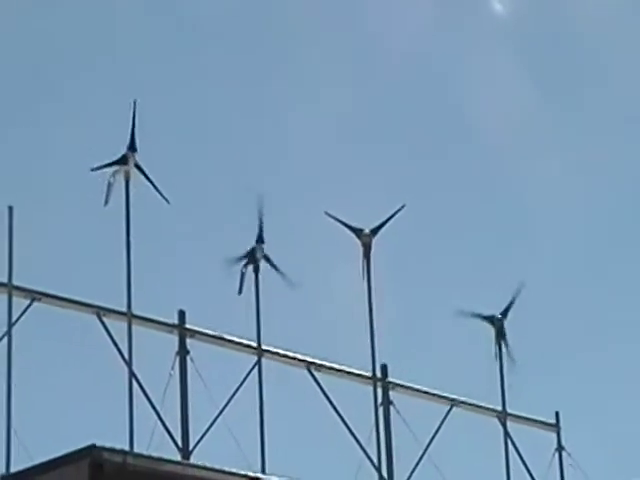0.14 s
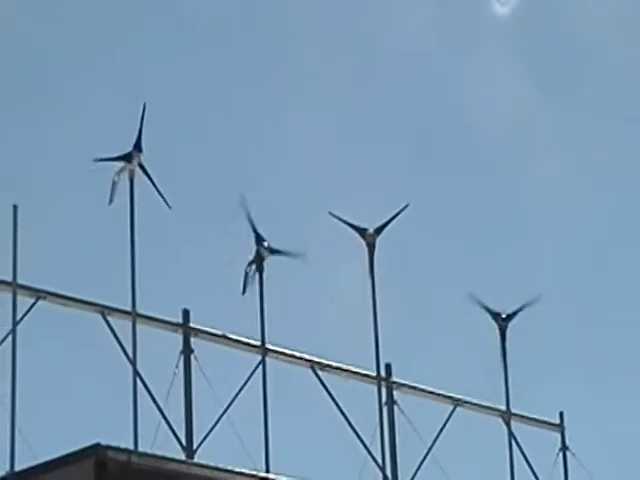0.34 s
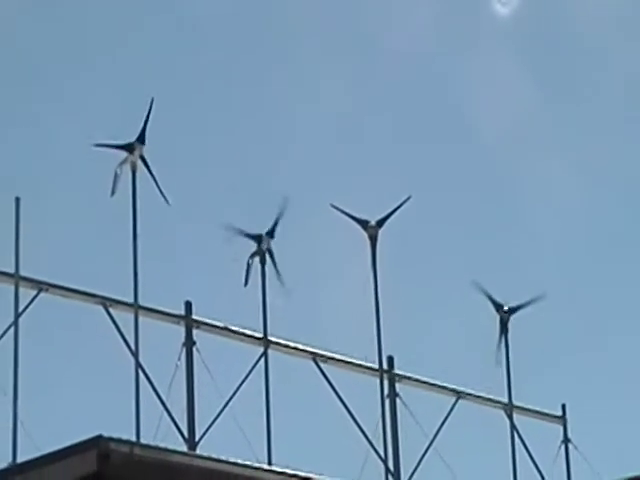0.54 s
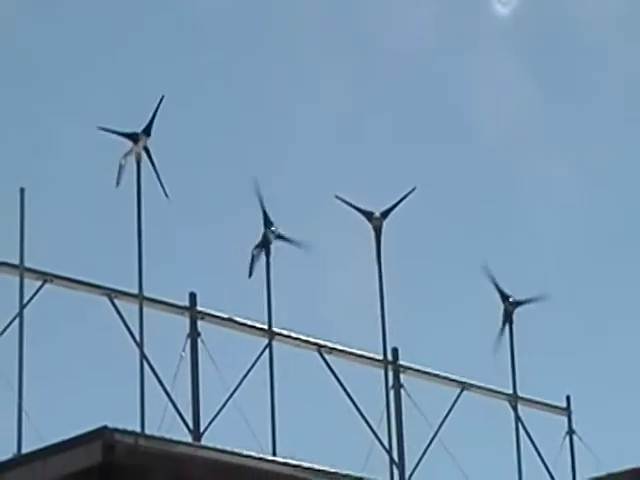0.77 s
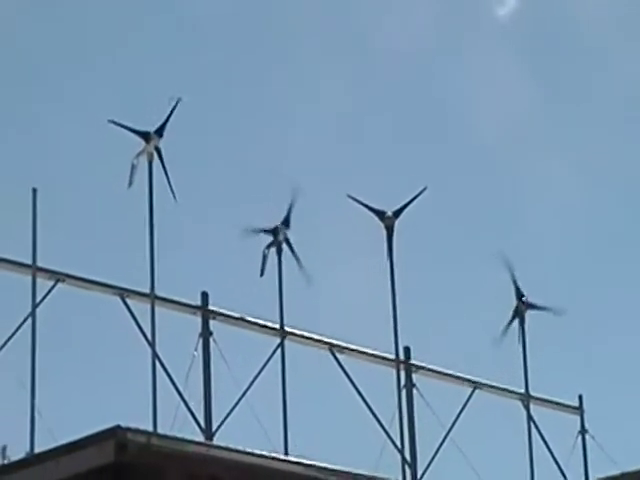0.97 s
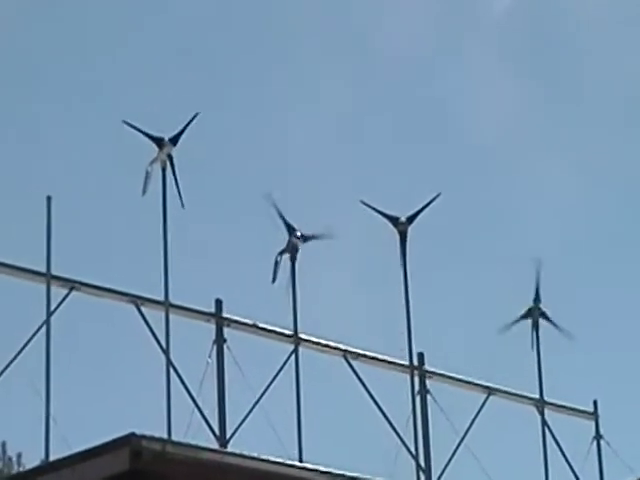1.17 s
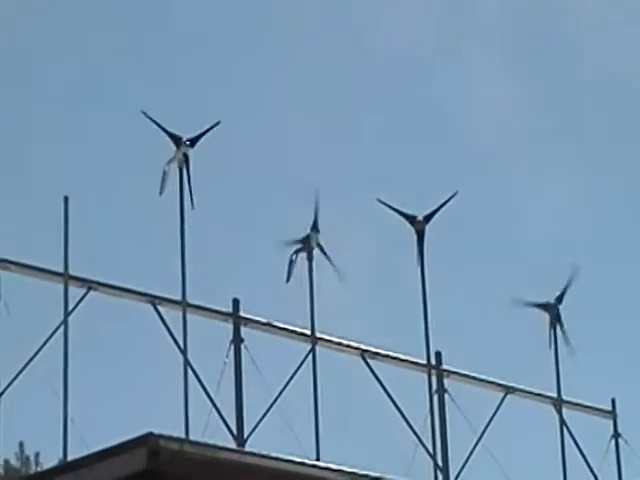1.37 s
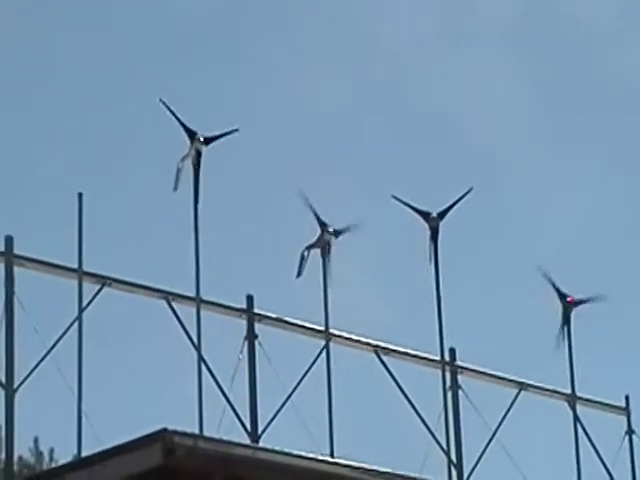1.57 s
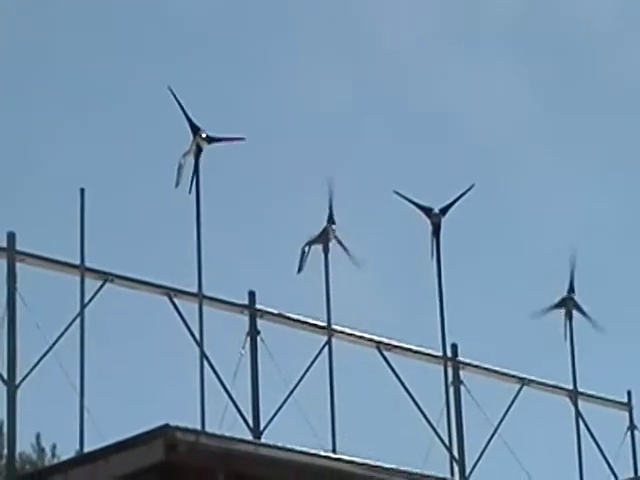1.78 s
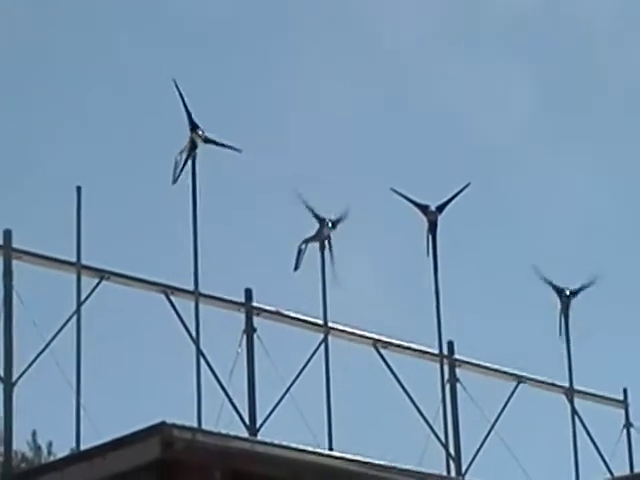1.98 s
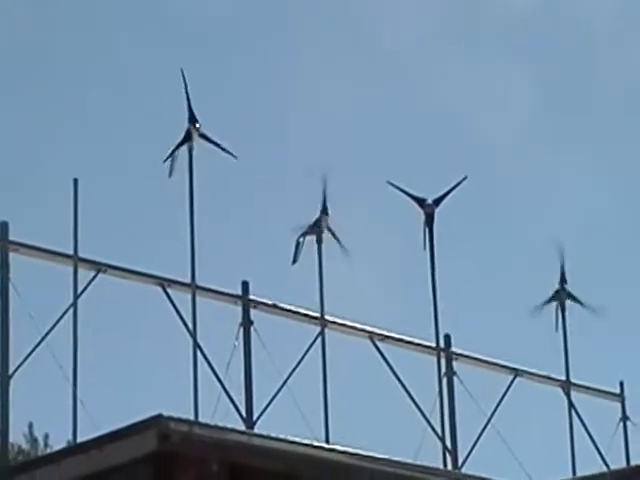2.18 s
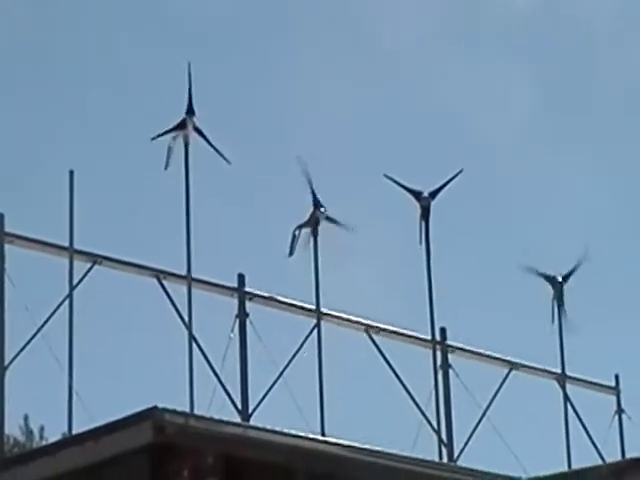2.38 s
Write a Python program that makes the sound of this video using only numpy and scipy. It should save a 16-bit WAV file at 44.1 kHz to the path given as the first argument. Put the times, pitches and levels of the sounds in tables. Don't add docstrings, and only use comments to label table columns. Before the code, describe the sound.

Fast-spinning little turbine rotors flutter with high whistling hiss, as wind buffets and thumps the microphone

```python
import sys
import numpy as np
from scipy import signal
from scipy.fft import rfft, irfft, next_fast_len
from scipy.io import wavfile
from scipy.ndimage import uniform_filter1d

SR = 44100
rng = np.random.default_rng(int(sys.argv[2]) if len(sys.argv) > 2 else 0)


def field_ratio(decibels):
    return 10 ** (np.asarray(decibels, dtype=float) / 20)


def pcm_store(signal):
    levels = np.round(np.clip(np.atleast_2d(signal), -1, 1) * 32767)
    wavfile.write(sys.argv[1], SR, levels.astype(np.int16).T)


N = 111573
M = next_fast_len(N)
T = np.arange(N) / SR
F = np.maximum(np.arange(M // 2 + 1) * SR / M, 1)

# [t/s, level/dB]
GUSTS = [(0, -20.5), (.13, -21), (.24, -29), (.33, -51), (.45, -31.5), (.5, -22.5), (.72, -24.5),
         (.8, -23.5), (1.05, -17.5), (1.08, -29.5), (1.35, -32.5), (1.58, -41), (1.85, -32.5),
         (2.02, -27.5), (2.13, -18.5), (2.18, -30), (2.25, -35), (2.53, -68.5)]


def curve(rows, axis=1):
    points = np.array(rows)
    return np.interp(T, points[:, 0], points[:, axis])


def over_hz(rows, axis=1):
    points = np.array(rows)
    return np.interp(np.log(F), np.log(points[:, 0]), points[:, axis])


def unit(x):
    return x / np.sqrt(np.mean(x ** 2))


def back(spec):
    return irfft(spec, M)[..., :N]


def delay(seconds):
    return np.exp(-2j * np.pi * F * seconds)


def walk(rate):
    hold = int(SR / rate)
    levels = rng.standard_normal(N // hold + 1)
    slewed = uniform_filter1d(np.repeat(levels, hold), hold)
    return unit(uniform_filter1d(slewed, hold)[:N])


def patchy(rows, patch_db, rate):
    spec = rfft(rng.standard_normal(M)) * field_ratio(over_hz(rows))
    total = np.zeros(N)
    for k in range(29):
        band = np.maximum(1 - abs(3 * np.log2(F / 30) - k), 0)
        total += back(spec * band) * field_ratio(patch_db * walk(rate))
    return unit(total)


def whistles(angle):
    # [t/s, share of the mean pitch]
    swing_rows = [
        (0, .1),
        (.7, .1),
        (1.2, .085),
        (1.4, .11),
        (1.52, .14),
        (1.7, .14),
        (1.8, .115),
        (2.0, .105),
        (2.53, .1),
    ]
    # [start t/s, length/s, f/Hz at the top of the swing, level/dB]
    blade_a = [(0.011, 0.018, 7900, -37), (0.044, 0.007, 7550, -38), (0.095, 0.048, 7775, -36),
               (0.188, 0.032, 7775, -38), (0.232, 0.008, 7850, -37), (0.272, 0.038, 7775, -38),
               (0.317, 0.008, 7900, -38), (0.363, 0.048, 7700, -36), (0.58, 0.018, 8000, -42),
               (1.255, 0.018, 8000, -43), (1.35, 0.01, 8100, -44), (0.452, 0.054, 7600, -35),
               (0.553, 0.05, 7550, -32), (0.66, 0.032, 7500, -33), (0.732, 0.06, 7400, -41),
               (0.824, 0.06, 7325, -41), (0.92, 0.012, 7300, -39), (1.067, 0.036, 7250, -40),
               (1.159, 0.026, 7250, -38), (1.252, 0.022, 7250, -33), (1.345, 0.02, 7300, -31),
               (1.443, 0.012, 7350, -34), (1.531, 0.032, 7550, -36), (1.623, 0.032, 7600, -35),
               (1.626, 0.018, 8300, -45), (1.71, 0.036, 7425, -39), (1.798, 0.036, 7425, -36),
               (1.895, 0.026, 7425, -38), (1.986, 0.012, 7525, -43), (2.0, 0.016, 7550, -38),
               (2.094, 0.018, 7700, -43), (2.192, 0.008, 7650, -43), (2.394, 0.036, 7725, -41),
               (2.453, 0.018, 7650, -43)]
    blade_b = [(0.036, 0.008, 7300, -40), (0.072, 0.008, 9050, -43), (0.155, 0.01, 7800, -38),
               (0.256, 0.008, 9300, -45), (0.608, 0.016, 7250, -38), (1.476, 0.014, 6900, -42),
               (2.148, 0.008, 8800, -45), (2.238, 0.008, 8900, -45), (0.419, 0.026, 7950, -37),
               (0.429, 0.018, 9175, -48), (0.509, 0.026, 7750, -35), (0.602, 0.024, 7650, -33),
               (1.282, 0.012, 7475, -32), (1.298, 0.008, 7500, -37), (1.283, 0.018, 8750, -48),
               (1.286, 0.02, 6850, -39), (1.382, 0.005, 7600, -32), (1.39, 0.016, 7550, -40),
               (1.384, 0.026, 6825, -38), (1.464, 0.026, 7900, -46), (1.566, 0.03, 7750, -37),
               (1.656, 0.03, 7700, -38), (1.658, 0.018, 8900, -50), (1.747, 0.026, 7550, -44),
               (1.831, 0.026, 6925, -41), (1.838, 0.012, 7550, -37), (1.932, 0.012, 7600, -38),
               (2.187, 0.008, 7600, -39)]
    blade_c = [(0.014, 0.008, 8550, -38), (0.076, 0.012, 7300, -39), (0.09, 0.018, 8600, -41),
               (0.172, 0.008, 7250, -37), (0.182, 0.026, 8525, -46), (0.25, 0.018, 7350, -36),
               (0.363, 0.018, 8550, -44), (0.425, 0.012, 7150, -35), (0.449, 0.018, 8450, -42),
               (0.52, 0.026, 7075, -34), (0.544, 0.026, 8425, -41), (0.612, 0.014, 7050, -35),
               (0.64, 0.012, 8375, -37), (1.226, 0.022, 6800, -34), (1.317, 0.012, 6900, -30),
               (1.332, 0.012, 6900, -35), (1.415, 0.026, 6875, -38), (1.518, 0.012, 7250, -41),
               (1.531, 0.007, 7250, -36), (1.593, 0.008, 8350, -44), (1.605, 0.014, 8500, -39),
               (1.686, 0.012, 8400, -40), (1.704, 0.004, 8300, -40), (1.787, 0.012, 6975, -37),
               (1.88, 0.012, 7025, -38), (1.968, 0.016, 7050, -40), (2.069, 0.018, 7275, -45)]
    attack_s, wake_s = .005, .005
    swing = curve(swing_rows)
    out = np.zeros(N)
    for k, rows in enumerate((blade_a, blade_b, blade_c)):
        approach = np.cos(angle - 2 * np.pi * k / 3)
        bend = (1 + swing * approach) / (1 + swing)
        bend = bend * (1 + .006 * walk(220))
        cycles = np.cumsum(bend) / SR
        flutter = field_ratio(2.2 * walk(170))
        for start, length, top_hz, db in rows:
            a = max(int((start - attack_s) * SR), 0)
            b = min(int((start + length + 4 * wake_s) * SR), N)
            t = T[a:b]
            rise = np.clip((t - start) / attack_s + 1, 0, 1) ** 2
            fall = np.exp(np.minimum(start + length - t, 0) / wake_s)
            tone = np.sin(2 * np.pi * top_hz * cycles[a:b])
            out[a:b] += field_ratio(db + .2) * rise * fall * flutter[a:b] * tone
    return out * np.sqrt(2)


def rotors():
    # [turn count, t/s when the first blade comes fastest towards us]
    turns = [
        (-1, -.027),
        (0, .063),
        (2, .249),
        (5, .514),
        (11, 1.075),
        (16, 1.5405),
        (17, 1.632),
        (22, 2.105),
        (27, 2.555),
    ]
    # [t/s, near rotor level/dB, far rotors level/dB]
    load = [(0, -38, -53.5), (.2, -37, -56.5), (.5, -35, -55.5), (.68, -35, -60), (.85, -38, -67),
            (1.12, -39, -62.5), (1.3, -36.5, -58), (1.62, -38, -56), (1.85, -39, -65), (2.02, -41.5, -58.5),
            (2.2, -44.5, -53.5), (2.38, -41.5, -54.5), (2.53, -35.5, -58.5)]
    # [f/Hz, level/dB]
    near_colour = [(900, -32), (1800, -11), (3000, -6.5), (5000, -1.5), (6200, 1.5), (7500, -9.5),
                   (9000, -23), (15800, -60.5)]
    # [f/Hz, level/dB]
    far_colour = [(2000, -3), (5000, 8), (7500, 15.5), (8800, 13), (9500, 3), (12000, -8), (14500, -20),
                  (15800, -42.5)]
    # [t/s, level/dB over the hiss]
    slaps = [
        (2.115, 2),
        (2.143, 3),
        (2.155, 6),
        (2.171, 4.5),
        (2.181, -4.5),
        (2.191, 12),
        (2.22, 1.5),
    ]
    # [f/Hz, share]
    skew = [(1500, 0.05), (3000, 0.045), (5500, 0.0025), (7300, 0.015), (9000, 0.068), (11000, 0.44),
            (14000, .1)]
    turn_count, pass_s = np.array(turns).T
    angle = 2 * np.pi * np.interp(T, pass_s, turn_count)

    beat_db = np.cos(3 * angle - 1.5) - 0.01 * np.cos(angle - 1.5)
    stall = np.exp(-((T - 2.18) / .06) ** 2)
    beat_db = beat_db + .7 * stall * walk(200)
    slap_db = sum(db * np.exp(-((T - s) / 0.0069) ** 2) for s, db in slaps)
    near = patchy(near_colour, 1.5, 39.34) * field_ratio(curve(load) + 4 + beat_db + slap_db)
    far = patchy(far_colour, 0.87, 27) * field_ratio(curve(load, axis=2) + 11.5 + 2.9 * beat_db)

    tones = rfft(whistles(angle), M)
    mid = rfft(near + far, M) + tones
    high_tones = tones * field_ratio(-27.5) / (1 + (6900 / F) ** 20)
    side = (mid * over_hz(skew) + high_tones) * delay(0.00062)
    echo = field_ratio(-10) / (1 + (F / 7500) ** 6) * delay(.00196)
    return back(mid * (1 + echo) + side * np.array([[1], [-1]]))


def ports(drive, push):
    # [f/Hz, likeness 0-1, left lead/rad, left over right/dB]
    pair = [(30, 0.93, 0.74, 2.5), (84.6, 0.66, -0.27, .3), (276, 0.96, -1.79, -4.5),
            (606, 0.45, -1.05, -4.5), (1500, .1, 0.44, 17)]
    one = rfft(drive * rng.standard_normal(N) + push, M)
    two = rfft(drive * rng.standard_normal(N), M)
    like = np.clip(over_hz(pair), 0, .99)
    lead = over_hz(pair, axis=2)
    left = field_ratio(over_hz(pair, axis=3) / 2)
    right = like * np.exp(-1j * lead) * one + np.sqrt(1 - like ** 2) * two
    return np.array([one * left, right / left])


def wind():
    # [f/Hz, level/dB]
    rumble = [(20, -61), (45, -12.5), (80, -1.5), (140, 0), (330, -10.5), (700, -27.5), (1300, -60.5),
              (6000, -100)]
    gust_db = curve(GUSTS)
    low = field_ratio(gust_db + 2 * walk(24.91))
    high = field_ratio(gust_db + 0.063 * (gust_db + 21.0) + 3.1 * walk(44.69))
    colour = unit(field_ratio(over_hz(rumble)))
    share = 1 / (1 + (F / 264) ** 4)
    rumbling = share * ports(low, 0) * field_ratio(-0.72)
    buffeting = np.sqrt(1 - share ** 2) * ports(high, 0) * field_ratio(-4.0)
    return back(colour * (rumbling + buffeting))


def crackle():
    # [f/Hz, level/dB]
    spike_colour = [(300, -14), (600, 4), (1200, -6), (2500, -14), (4000, -30), (9000, -63)]
    spikes = field_ratio(0.83 * (curve(GUSTS) + 19.5) + 5.9 * walk(90)) * rng.standard_normal(N)
    colour = unit(field_ratio(over_hz(spike_colour)))
    return field_ratio(-33.5 - 23.0) * back(rfft(spikes, M) * colour) * np.array([[1], [-.8]])


def town():
    # [f/Hz, level/dB]
    murmur = [(30, -13.5), (90, 1.5), (170, -8.5), (300, -15.5), (760, -20.5), (2000, -28), (9000, -71.5)]
    middle = patchy(murmur, 2.3, 8.65)
    spread = 0.11 * patchy(murmur, 1.2, 8) * np.array([[1], [-1]])
    return field_ratio(-46.5 + 7.5) * (middle + spread)


def puffs():
    # [t/s, peak level/dB, swirl f/Hz, length/s]
    eddies = [(.123, -20, 117, 0.0062), (.512, -18, 109, .008), (.554, -11, 144, 0.0048),
              (.62, -17.5, 90, 0.013), (.655, -17, 236, .006), (.80, -15.5, 100, 0.01),
              (.83, -20.5, 140, 0.0037), (.913, -12, 128, 0.0039), (.948, -28.5, 103, 0.014),
              (1.02, -16, 110, 0.0064), (1.047, -21.5, 131, .012), (1.169, -20, 132, 0.002),
              (1.92, -18.5, 126, 0.0063), (2.024, -20, 378, 0.0027), (2.026, -12.5, 170, 0.0046),
              (2.076, -24, 330, 0.01), (2.16, -31, 418, 0.0084), (2.052, -22.5, 190, 0.0066),
              (2.15, -22.5, 205, 0.0078), (2.128, -12.5, 121, 0.012), (2.215, -15, 121, 0.0043)]
    push = np.zeros(N)
    for s, db, hz, length in eddies:
        swell = np.exp(-((T - s) / length) ** 2)
        push += field_ratio(db) * swell * np.cos(2 * np.pi * hz * (T - s))
    return back(ports(0, push))


def knock():
    swell = np.exp(-((T - 2.103) / 0.0054) ** 2)
    burst = rfft(rng.standard_normal(N) * swell, M) / (1 + ((F - 1150) / 450) ** 4)
    return field_ratio(-32) * back(burst) * 5 * np.array([[.4], [1.3]])


def scene():
    return rotors() + wind() + crackle() + town() + puffs() + knock()


def roll_off(x):
    return signal.sosfilt(signal.butter(12, 15760, fs=SR, output="sos"), x)


def record(dry):
    hiss = field_ratio(-78) * rng.standard_normal(dry.shape)
    return roll_off(dry + hiss)


dry = scene()
out = record(dry)
pcm_store(out)
```